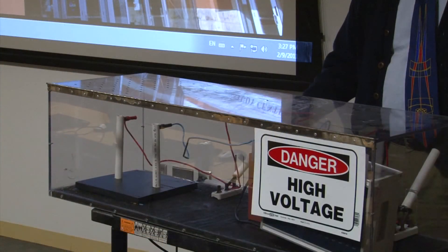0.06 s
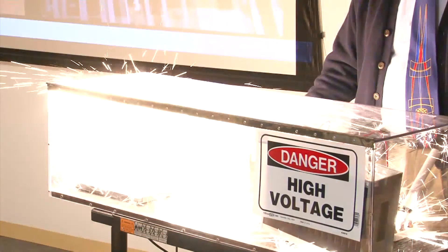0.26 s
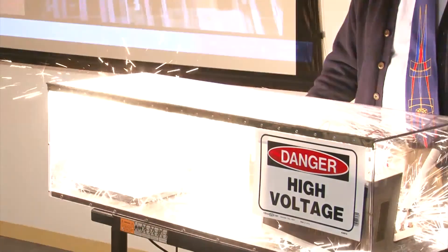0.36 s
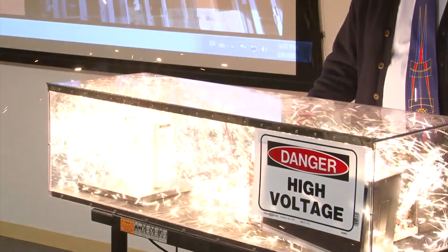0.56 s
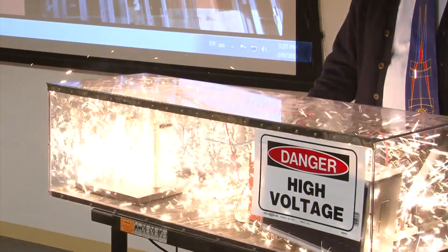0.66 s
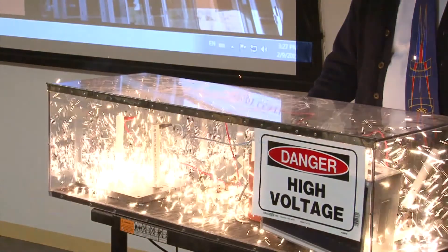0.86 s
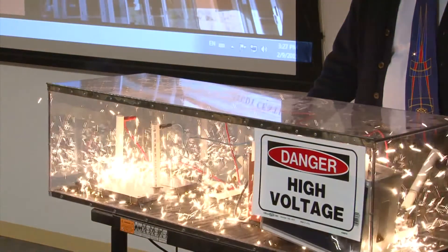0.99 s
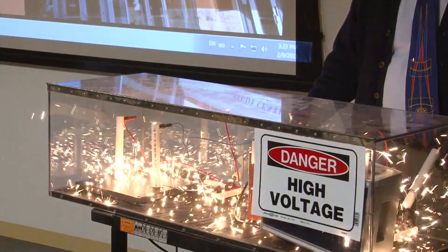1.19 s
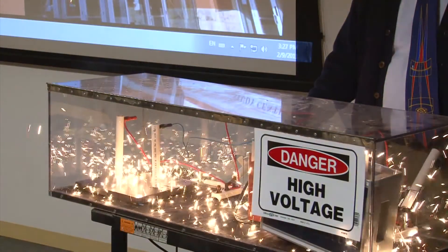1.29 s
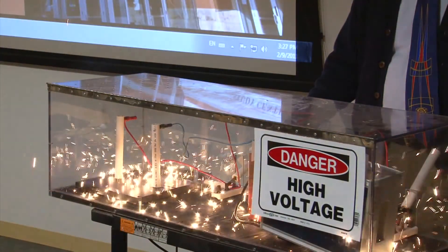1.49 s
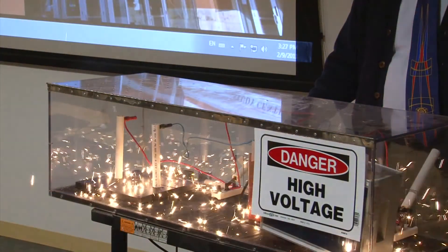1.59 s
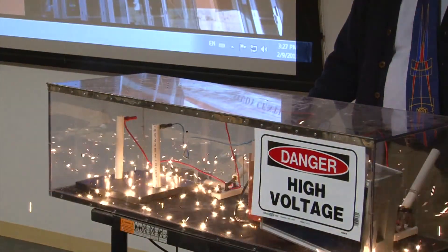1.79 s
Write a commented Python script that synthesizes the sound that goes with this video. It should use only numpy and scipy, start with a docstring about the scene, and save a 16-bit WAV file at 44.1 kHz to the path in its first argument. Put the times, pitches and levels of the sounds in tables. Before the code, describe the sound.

One loud high-voltage bang bursts a wire in a plastic safety box, just overloading the microphone on the right side. The panels ring briefly, the classroom echo dies away, and a few fragments tick very faintly against the box.

```python
"""Ventilation rumbles and a microphone hisses in a classroom; the left channel holds only faint hiss and whine.
A high-voltage discharge bursts a wire in a clear plastic safety box: air is shoved out, shock fronts slap
off the box and nearby surfaces, and the narrow-band microphone on the right channel just overloads.
The panels ring, and the room answers with a bright echo, then a long dull tail and low booming modes.
Last, three small fragments tick against the box."""
import sys
import numpy as np
from scipy import signal
from scipy.fft import rfft, irfft, next_fast_len
from scipy.io import wavfile
from scipy.ndimage import map_coordinates

SR = 44100
rng = np.random.default_rng(int(sys.argv[2]) if len(sys.argv) > 2 else 0)


def unload_audio(sound):
    """Save the sound as a 16-bit wav file, at the path given as the first command line argument."""
    columns = np.transpose(np.atleast_2d(sound))
    # keep every value between -1 and 1, then stretch to whole-number steps
    steps = np.round(np.clip(columns, -1, 1) * 32767)
    wavfile.write(sys.argv[1], SR, steps.astype(np.int16))


N = 81585

# shock fronts at the microphone, direct and reflected: (time [s], level [dB])
SHOCK_ARRIVALS = [(0.2198, 0), (.2208, 0), (.2233, -1.5), (0.2275, 5.5), (.2316, -3), (0.257, -3.5),
                  (0.2646, -5), (.2712, -6), (0.2776, -6), (0.2922, -5.5), (.317, -9.5), (.332, -10)]
# a low room mode at 105 Hz, then normal modes of the panels and the enclosed air: (frequency [Hz], level [dB],
# T60 [s])
BOX_MODES = [(105, -23.5, 1), (463.4, -21.5, 0.61), (558.4, -26, 0.32), (1108, -22, .45), (1312, -21, .5),
             (1403, -20.5, .3), (1435, -17, .4), (1640, -20.5, .48), (1668, -22, 0.59), (2098, -22, 0.29),
             (2357, -19.5, .38), (2705, -22.5, 0.29), (3305, -23, .36), (3604.5, -25.5, .36),
             (4930, -25, 0.25)]
# room modes; close pairs beat, so the boom throbs: (frequency [Hz], level [dB], T60 [s])
STANDING_WAVES = [(29.134, -33, 2.3), (35.32, -23, 2.6), (38.6, -27.5, 1.8), (42.7, -21.5, 1.1),
                  (56.84, -28.5, 2.6), (60.5, -20, 1.1), (63.2, -17, 1.2), (69.8, -27, 1.7),
                  (188, -30.5, 1.7), (211, -28, 1.4), (284.6, -29.5, .9), (306.6, -26, 1.4),
                  (306.5, -29.5, 0.74), (357, -31.5, 1.7)]
# early diffuse field: (frequency [Hz], initial density [dB/Hz], T60 [s])
EARLY_FIELD = [(15, -64, 0.67), (55, -58, 1.3), (120, -49.5, 0.98), (351.2, -44.5, 1), (900, -49, .8),
               (1450, -42.5, .75), (2350, -44.5, .67), (2900, -50, 0.59), (4850, -50.5, 0.55),
               (5200, -53, 0.37), (6000, -54.5, 0.37)]
# late reverberation: (frequency [Hz], initial density [dB/Hz], T60 [s])
LATE_FIELD = [(14.97, -79, 2.8), (55, -67.5, 2.3), (130, -51.5, 2.06), (382, -55.5, 2.1),
              (790, -64.5, 2.41), (1455, -58.5, 1.964), (3028, -65, 1.35), (4630, -70, 1.128),
              (6000, -97, .7)]
# fragments landing: (time [s], level before the envelope [dB], centre frequency [Hz])
FRAGMENT_IMPACTS = [(1.459, -63, 2200), (1.482, -61, 3100), (1.492, -68, 3000)]
# ventilation rumble and microphone hiss: (frequency [Hz], density [dB/Hz])
AMBIENT_SPECTRUM = [(20, -76.5), (45, -80.5), (85, -80.5), (110, -75.5), (160, -89), (240, -107),
                    (400, -99), (490, -89.5), (620, -106), (1000, -119), (2500, -125), (4000, -124),
                    (4600, -137), (15000, -142)]
# hiss of the idle left input: (frequency [Hz], density [dB/Hz])
IDLE_SPECTRUM = [(20, -102), (150, -108), (350, -106), (900, -111), (4200, -110), (4600, -138),
                 (15000, -145)]

BANG_S = .218  # the wire bursts
PUSH_DB, PUSH_S = -7.5, .0064  # the slow shove of air out of the box
SHOCK_S = .00036  # duration of one front's overpressure
SCATTER_DB, SCATTER_S = -15, .0011
ECHO_DELAY_S, ECHO_RISE_S, TAIL_RISE_S = .0015, .002, .05
FLUTTER_DB, FLUTTER_PER_S = .77, 150  # reflections arrive in clumps
TICK_T60_S, TICK_WIDTH_HZ = .048, 800
WHINE_HZ, WHINE_DB = 3849, -85
MIC_HZ, MIC_ORDER = 5973, 50
CLIP_HARDNESS, SHELF_HZ, BAND_LIMIT_HZ = 30, 7500, 15800


def exploding_wire():
    """Sudden expansion displaces air, launches shock fronts and excites the box's modes."""
    push = amp(PUSH_DB) * blast_wave(BANG_S, PUSH_S) * rise(since(BANG_S), attack_s=.0012)
    shocks = sum(amp(db) * shock_front(s) for s, db in SHOCK_ARRIVALS)
    return push + shocks + damped_modes(BOX_MODES, attack_s=.0022)


def shock_front(start_s):
    """Scattering at the box's walls trails each front with a brief burst of noise."""
    t = since(start_s)
    envelope = amp(SCATTER_DB) * (t > 0) * np.exp(-t / SCATTER_S)
    scatter = rng.standard_normal(N) * np.sqrt(SR / 2 / MIC_HZ)  # unit power in the microphone's band
    return blast_wave(start_s, SHOCK_S) + envelope * scatter


def blast_wave(start_s, overpressure_s):
    """Compression and rarefaction: a jump in pressure falls into a longer suction."""
    u = since(start_s) / overpressure_s
    return (u > 0) * (1 - u) * np.exp(-u)


def damped_modes(modes, attack_s):
    """Free vibration: after the bang each mode is an exponentially decaying sinusoid."""
    t = since(BANG_S)
    partials = (amp(db) * decay(t, t60) * np.sin(2 * np.pi * hz * t) for hz, db, t60 in modes)
    return rise(t, attack_s) * sum(partials)


def classroom():
    """Repeated reflection builds an early echo, a slower tail and standing waves."""
    t = since(BANG_S + ECHO_DELAY_S)
    flutter = amp(FLUTTER_DB * wobble(FLUTTER_PER_S))
    echo = diffuse_field(EARLY_FIELD) * rise(t, ECHO_RISE_S) * flutter
    tail = diffuse_field(LATE_FIELD) * rise(t, TAIL_RISE_S)
    return echo + tail + damped_modes(STANDING_WAVES, attack_s=.02)


def diffuse_field(table, size=512):
    """Reverberant decay: each frequency of a noise dies at its own rate after the bang."""
    table_hz, _, t60 = np.transpose(table)
    hz, t, spectrum = signal.stft(noise(table), SR, nperseg=size)
    fade = decay(np.maximum(t - BANG_S, 0), along(hz, table_hz, t60)[:, None])
    return signal.istft(spectrum * fade, nperseg=size)[1][:N]


def debris():
    """Impact: each fragment striking the box radiates a quickly damped band of noise."""
    ticks = np.zeros(N)
    for start_s, db, centre_hz in FRAGMENT_IMPACTS:
        t = since(start_s)
        white = rng.standard_normal(N)
        band = filtered(white, lambda hz: np.exp(-((hz - centre_hz) / TICK_WIDTH_HZ) ** 2))
        ticks += amp(db) * band / band.std() * rise(t, attack_s=.0015) * decay(t, TICK_T60_S)
    return ticks


def microphone(x):
    """Limited bandwidth: the response falls steeply above the cutoff."""
    return filtered(x, lambda hz: 1 / np.sqrt(1 + (hz / MIC_HZ) ** (2 * MIC_ORDER)))


def idle_input():
    """Electronic self-noise: broadband hiss and one faint tone."""
    return noise(IDLE_SPECTRUM) + amp(WHINE_DB) * np.sin(2 * np.pi * WHINE_HZ * since(0))


def noise(table):
    """Spectral shaping gives white noise the tabulated power density."""
    table_hz, db = np.transpose(table)[:2]
    return filtered(rng.standard_normal(N), lambda hz: amp(along(hz, table_hz, db)) * np.sqrt(SR / 2))


def filtered(x, response):
    """Linear filtering multiplies the spectrum by a frequency response."""
    size = next_fast_len(N + SR // 2)
    return irfft(rfft(x, size) * response(np.fft.rfftfreq(size, 1 / SR)), size)[..., :N]


def wobble(knots_per_s):
    """Spline interpolation joins random values into a smooth curve."""
    return map_coordinates(rng.standard_normal(N // 10), [np.arange(N) * knots_per_s / SR], mode="wrap")


def along(hz, table_hz, values):
    """Interpolation on a logarithmic frequency axis."""
    return np.interp(np.log(hz + 1), np.log(np.asarray(table_hz) + 1), values)


def rise(t, attack_s):
    """Exponential build-up from 0 to 1."""
    return 1 - np.exp(-t / attack_s)


def decay(t, t60):
    """Exponential damping, 60 dB in t60 seconds."""
    return np.exp(-np.log(1000) * t / t60)


def since(start_s):
    """Seconds since an onset, zero before it."""
    return np.maximum(np.arange(N) / SR - start_s, 0)


def amp(db):
    """Decibels to amplitude ratio."""
    return 10 ** (np.asarray(db) / 20)


def scene():
    """Superposition: the sources and the ambient noise add on the right; the left input idles."""
    left = idle_input()
    right = microphone(exploding_wire() + classroom() + debris()) + noise(AMBIENT_SPECTRUM)
    return np.array([left, right])


def record(dry):
    """Saturation clips the highest peaks; a 6 dB shelf softens the treble below a hard band limit."""
    clipped = dry / (1 + np.abs(dry) ** CLIP_HARDNESS) ** (1 / CLIP_HARDNESS)
    return filtered(clipped, lambda hz: (hz < BAND_LIMIT_HZ) * (.5 + .5 / (1 + (hz / SHELF_HZ) ** 10)))


dry = scene()
out = record(dry)
unload_audio(out)
```